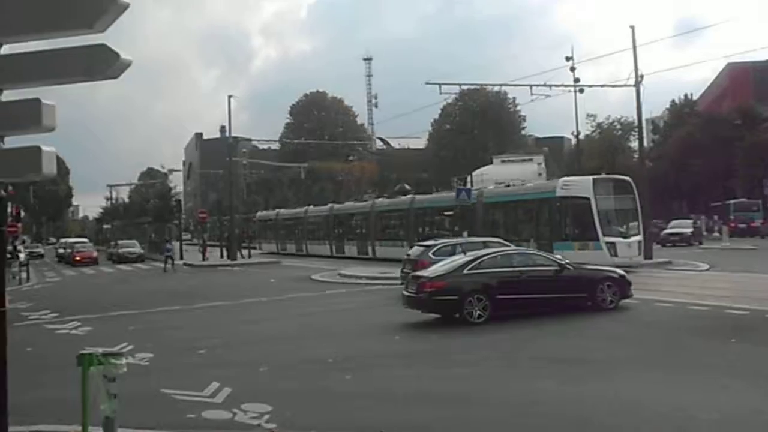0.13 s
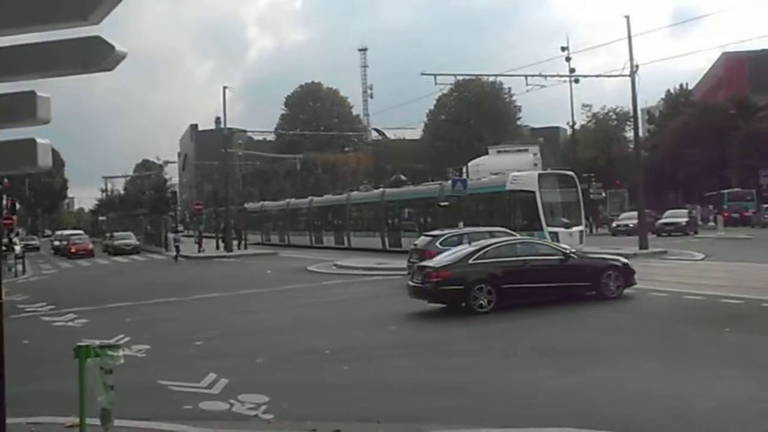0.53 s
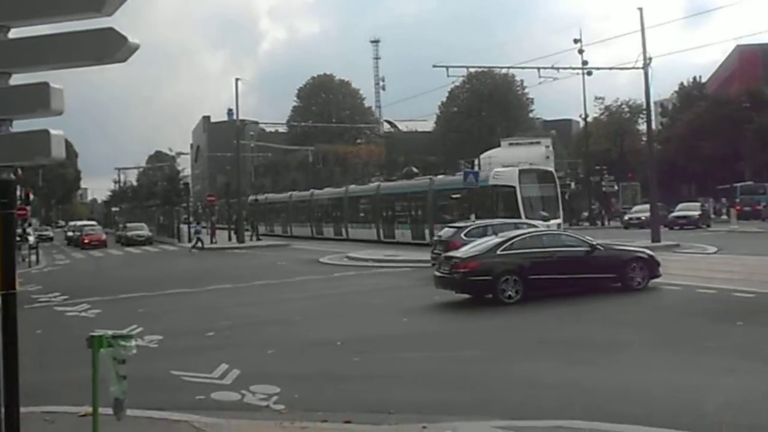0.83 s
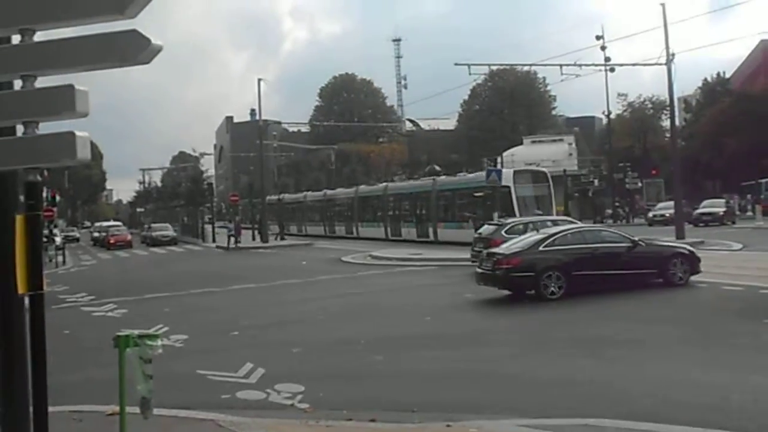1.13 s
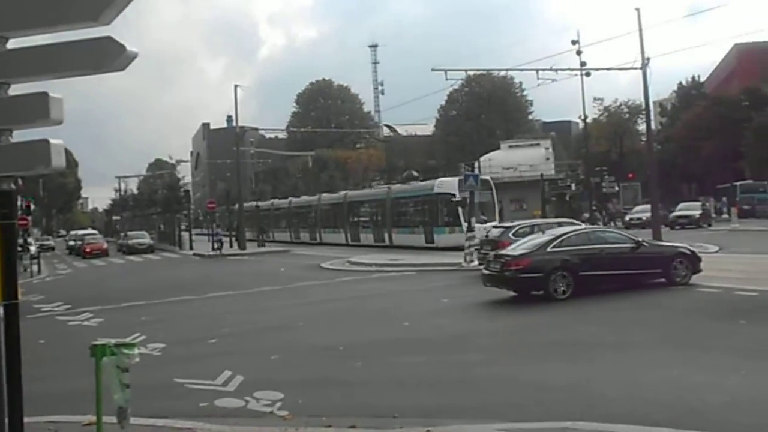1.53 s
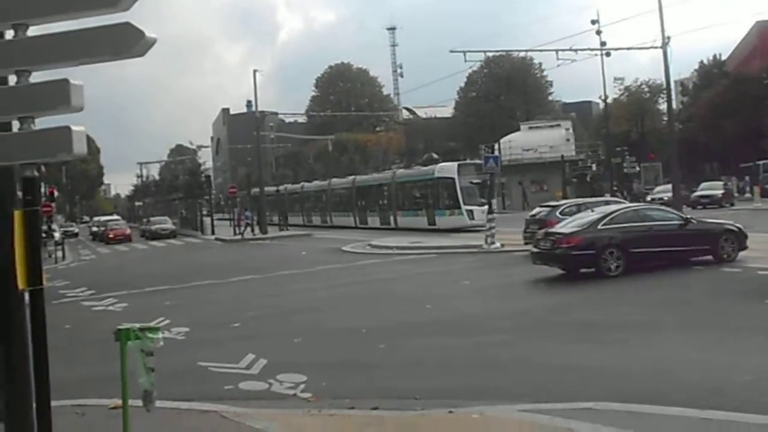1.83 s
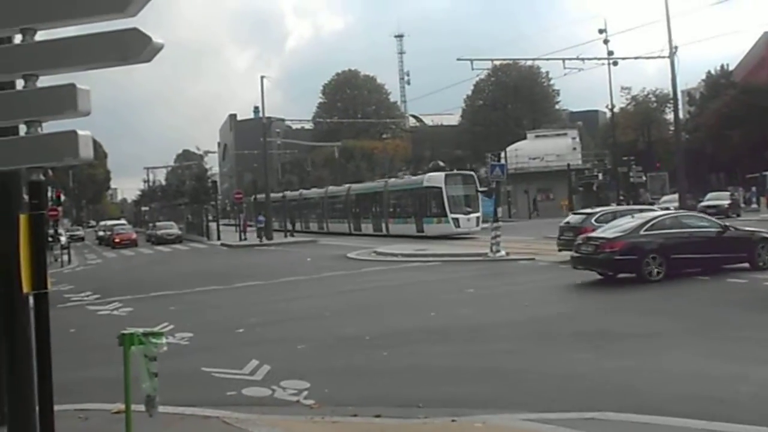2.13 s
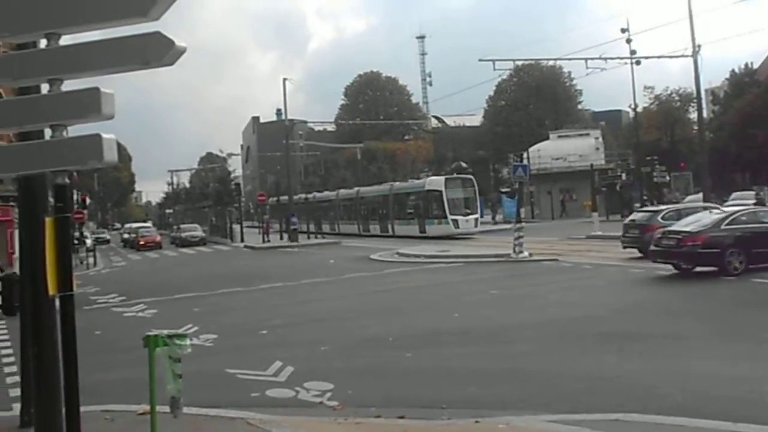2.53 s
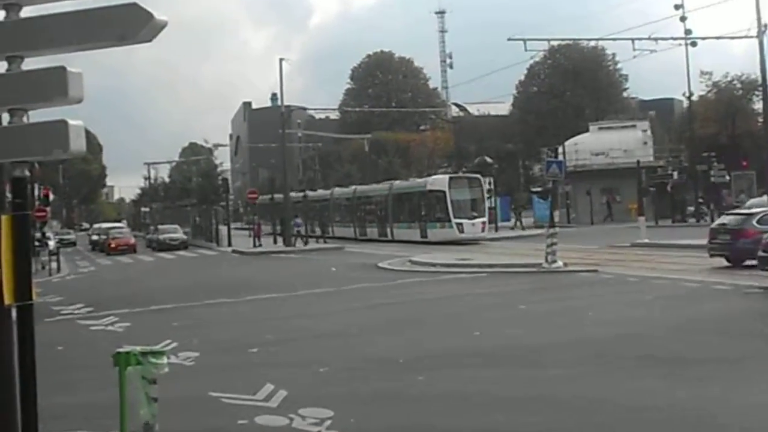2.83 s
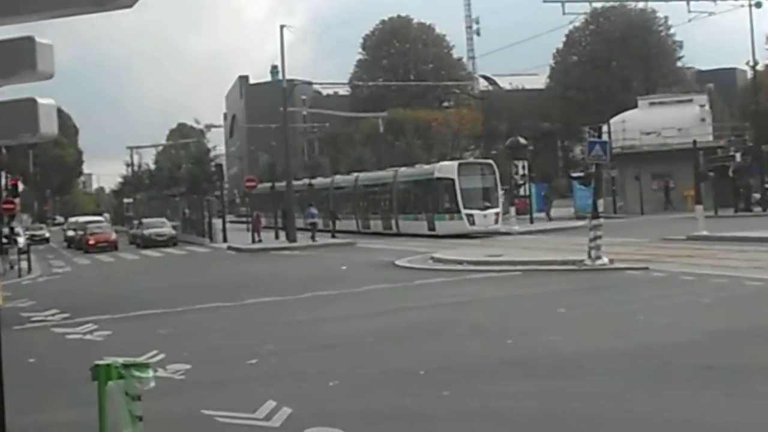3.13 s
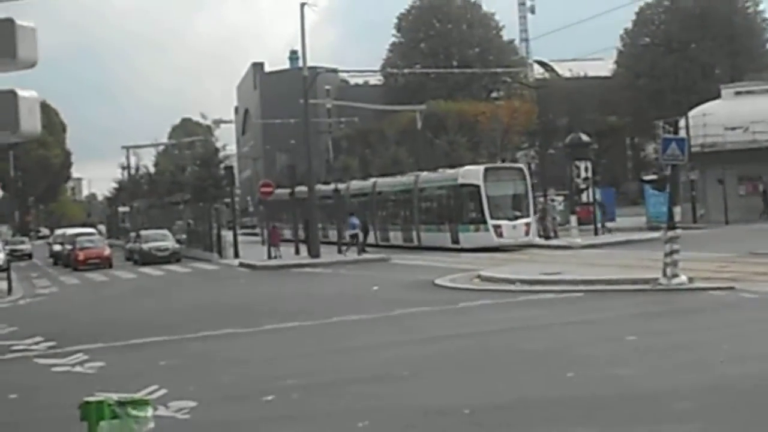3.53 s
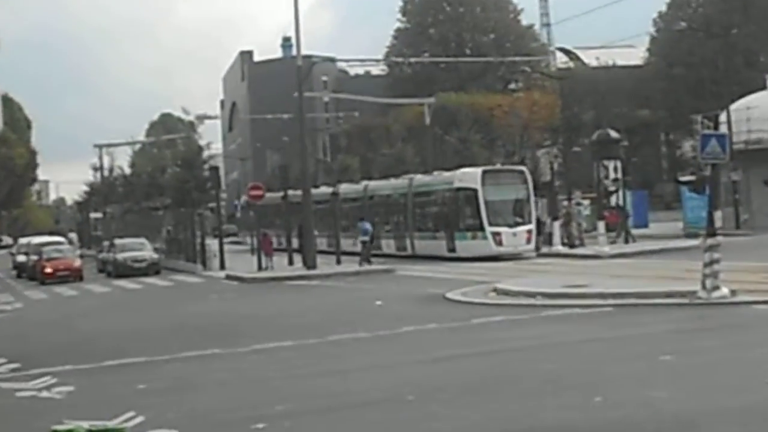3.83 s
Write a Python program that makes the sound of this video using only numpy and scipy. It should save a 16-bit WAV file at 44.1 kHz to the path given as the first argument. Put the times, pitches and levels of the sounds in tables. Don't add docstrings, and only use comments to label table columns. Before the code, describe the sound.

Tram wheel squeal, high and sustained, ringing over the low traffic rumble of a city crossing

```python
import sys
import numpy as np
from scipy import signal
from scipy.io import wavfile

SR = 44100
rng = np.random.default_rng(int(sys.argv[2]) if len(sys.argv) > 2 else 0)


def boost_factor(decibels):
    exponent = np.asarray(decibels, float) / 20
    return 10 ** exponent


def pcm_store(signal):
    levels = np.round(np.clip(np.atleast_2d(signal), -1, 1) * 32767)
    wavfile.write(sys.argv[1], SR, levels.astype(np.int16).T)


N = 176400

# (time [s], level [dB])
TRAFFIC_SWELL = [(0.07, -50), (0.36, -35.5), (0.95, -26), (0.97, -28.5), (1.15, -25), (1.83, -23.5),
                 (2.01, -22.5), (2.05, -23), (2.13, -23.5), (3.88, -25.5), (3.89, -23.5), (4.0, -27.5)]
# (frequency [Hz], level [dB per Hz])
ROAD_COLOUR = [(35, -53), (60, 2.5), (114, -4), (246, 3), (441, -8), (681, -8), (2450, -26.5),
               (3850, -56.5), (5400, -72), (7020, -85), (11900, -120)]
# (centre [Hz], width [Hz], level over the road [dB])
BODY_DRONES = [
    (254, 63, -10),
    (620, 127, -7),
    (1240, 248, -11.5),
    (2450, 100, -34.5),
    (3740, 440, -36.5),
    (3180, 270, -46),
]
# (pitch [Hz], level [dB])
MOTOR_WHINE = [
    (2459, -52),
    (4916, -66),
]
# (start [s], end [s], first pitch [Hz], last pitch [Hz], level [dB])
ENGINE_HUMS = [
    (1.3, 3.0, 151, 154, -38),
    (1.0, 2.6, 238, 276, -38),
]
# (time [s], length [s], pitch [Hz], level [dB])
BIRD_CHIRPS = [
    (1.26, .08, 5980, -64),
    (1.6, .085, 5990, -59),
    (1.725, .105, 5950, -55),
    (1.855, .11, 5945, -55),
]
# (time [s], level [dB])
HISS_SWELL = [(0.08, -79.5), (0.39, -62), (0.8, -57.5), (0.83, -54), (0.92, -56), (1.48, -48.5),
              (1.54, -47), (1.56, -50), (1.99, -49), (2.01, -50), (3.94, -53), (4.0, -52)]
# (frequency [Hz], level [dB per Hz])
HISS_COLOUR = [(5500, -24), (6300, -19), (7000, -12.5), (8000, -7), (9500, 0.5), (10700, 1.5), (11500, -15),
               (12400, -9)]
# (time [s], length [s], level [dB], centre [Hz])
VALVE_PUFFS = [
    (0.164, .006, -63, 9400),
    (1.112, .02, -49.5, 9800),
    (1.503, .02, -41, 10200),
    (1.518, 0.013, -40, 8500),
    (1.535, 0.024, -45.5, 8950),
    (2.368, .004, -40, 10500),
    (3.3, 0.0091, -43, 10000),
    (3.534, .015, -46, 10000),
]
# (time [s], level [dB])
SQUEAL_LEVEL = [(1.33, -51), (1.385, -44), (1.5, -46.5), (1.68, -50), (1.97, -46.5), (2.4, -44), (2.5, -46),
                (2.75, -47.5), (3.02, -44), (3.3, -43), (3.62, -44), (3.8, -54.5), (3.92, -62), (4, -42)]
# (time [s], pitch [Hz])
SQUEAL_PITCH = [(1.33, 3765), (1.39, 3708), (1.5, 3712), (1.68, 3740), (1.8, 3705), (1.97, 3722),
                (2.2, 3685), (2.4, 3690), (2.5, 3625), (2.75, 3640), (3.02, 3668), (3.3, 3652),
                (3.62, 3652), (3.8, 3610), (3.92, 3600), (4, 3630)]
# (time [s], level [dB])
SLIP_BITE = [(1.33, -24), (2.0, -16), (2.4, -8), (3.1, -7), (3.3, -6.5), (3.68, -7), (3.8, -15), (4, -20)]
# (start [s], end [s], pitch [Hz], width [Hz], level [dB])
RIM_MODES = [
    (1.5, 2.47, 3780, 16, -54),
    (2.2, 4.1, 3505, 50, -52),
    (1.4, 3.85, 3630, 100, -50.5),
    (3.05, 3.75, 3835, 12, -61),
    (.95, 1.5, 5180, 80, -70),
]
# (centre [Hz], width [Hz])
MIC_NOTCHES = [
    (5512.5, 500),
    (11025, 330),
]


def rms_one(x):
    return x / np.sqrt(np.mean(np.abs(x) ** 2) + 1e-20)


def in_time(rows):
    s, *columns = np.transpose(rows)
    return [np.interp(np.arange(N) / SR, s, column) for column in columns]


def drift(rate_hz):
    r = np.exp(-20 * np.pi * rate_hz / SR)
    white = rng.standard_normal(N // 10 + 9002)
    slow = signal.lfilter([1], [1, -2 * r, r * r], white)[9000:]
    return np.interp(np.arange(N) / 10, np.arange(len(slow)), rms_one(slow))


def gate(start, length, edge):
    t = np.arange(N) / SR - start
    return np.clip(np.minimum(t, length - t) / edge + 0.5, 0, 1)


def resonate(x, hz, width_hz):
    r = np.exp(-np.pi * width_hz / SR)
    return signal.lfilter([1, 0, -1], [1, -2 * r * np.cos(2 * np.pi * hz / SR), r * r], x)


def band_pass(x, low_hz, high_hz, order):
    return signal.sosfilt(signal.butter(order, [low_hz, high_hz], "band", fs=SR, output="sos"), x)


def banded_noise(spectrum, edges, patchy_db, shared_db):
    out = 0
    together = drift(8.5)
    white = rng.standard_normal((2, N))
    hz, db = np.transpose(spectrum)
    for k, (low, high) in enumerate(zip(edges, edges[1:])):
        band = band_pass(white[k % 2], low, high, 3)
        level_db = np.interp(np.log(low * high) / 2, np.log(hz), db)
        out = out + band * boost_factor(level_db + patchy_db * drift(6.5) + shared_db * together)
    return rms_one(out)


def wavering(hz, width_hz, steady):
    spin = np.exp(2j * np.pi * np.cumsum(hz + np.zeros(N)) / SR)
    echoes = drift(width_hz) + 1j * drift(width_hz)
    return rms_one(np.real(spin * (steady + echoes)))


def wind(traffic_db):
    rumble = rms_one(band_pass(rng.standard_normal(N), 18, 68.4, 2))
    return rumble * boost_factor(-36.5 + 0.17 * (traffic_db - traffic_db.max())) * gate(0.11, 9, 0.5)


def body_drones():
    out = 0
    for hz, width_hz, db in BODY_DRONES:
        level = boost_factor(db + drift(4))
        core = resonate(rng.standard_normal(N), hz, width_hz)
        out = out + level * rms_one(resonate(core, hz, 6 * width_hz))
    return out


def motor_whine():
    tones = sum(boost_factor(db) * wavering(hz, 4, 1.6) for hz, db in MOTOR_WHINE)
    return tones * gate(3.05, 9, 0.1)


def traffic():
    level_db, = in_time(TRAFFIC_SWELL)
    road = banded_noise(ROAD_COLOUR, np.geomspace(50, 5400, num=19), patchy_db=0.5, shared_db=-1.52)
    return boost_factor(level_db - 1.5) * (road + body_drones()) + wind(level_db) + motor_whine()


def engines():
    t = np.arange(N) / SR
    out = 0
    for s, end, first_hz, last_hz, db in ENGINE_HUMS:
        hz = np.interp(t, [s, end], [first_hz, last_hz])
        out = out + boost_factor(db) * gate(s, end - s, 0.4) * wavering(hz, 5, 0.9)
    return out


def bird():
    t = np.arange(N) / SR
    out = 0
    for s, length, hz, db in BIRD_CHIRPS:
        falling_hz = hz - 70 * (t - s) / 0.1
        out = out + boost_factor(db) * gate(s, length, 0.05) * wavering(falling_hz, 45, 0.8)
    return out


def hiss():
    level_db, = in_time(HISS_SWELL)
    bed = banded_noise(HISS_COLOUR, np.geomspace(5500, 12400, num=13), patchy_db=0.35, shared_db=-0.5)
    out = boost_factor(level_db + 3) * bed
    noise = rng.standard_normal(N)
    for s, length, db, hz in VALVE_PUFFS:
        puff = noise
        for _ in range(3):
            puff = resonate(puff, hz, 3500)
        out = out + boost_factor(db) * gate(s, length, 0.0035) * rms_one(puff)
    return out


def rim_modes(on):
    (hz,), (db,) = in_time(SQUEAL_PITCH), in_time(SQUEAL_LEVEL)
    out = boost_factor(db) * on * wavering(hz + 5 * drift(6.8), 25, 0.9)
    for s, end, mode_hz, width_hz, mode_db in RIM_MODES:
        out = out + boost_factor(mode_db) * gate(s, end - s, 0.2) * wavering(mode_hz, width_hz, 0.3)
    return out


def slip_overtones():
    bite_db, = in_time(SLIP_BITE)
    since_start = np.arange(N) / SR - SQUEAL_LEVEL[0][0]
    second_width_hz, third_width_hz = 97, 210
    second = wavering(7430 - 84 * since_start, second_width_hz, 0)
    second = second + boost_factor(-6) * wavering(2 * RIM_MODES[1][2], second_width_hz, 0)
    third = wavering(10550, third_width_hz, 0) + boost_factor(-8) * wavering(11350, third_width_hz, 0)
    third_level = boost_factor(7 + 1.35 * bite_db + 1.5 * drift(14))
    third_swell = 0.45 + 0.46 * gate(3.15, 0.6, 0.17)
    return boost_factor(-44.5) * (boost_factor(bite_db) * second + third_level * third_swell * third)


def squeal():
    on = gate(1.33, 9, 0.012)
    return rim_modes(on) + on * slip_overtones()


def scene():
    return (traffic() + engines() + bird() + hiss() + squeal())[None]


def top_cut(x):
    return signal.sosfilt(signal.butter(12, 12230, fs=SR, output="sos"), x)


def record(dry):
    x = dry * gate(0.0735, 9, 0.00052)
    for hz, width_hz in MIC_NOTCHES:
        x = signal.lfilter(*signal.iirnotch(hz, hz / width_hz, SR), x)
    dip_hz, dip_width_hz, dip_share = 5810, 1350, 0.58
    b, a = signal.iirpeak(dip_hz, dip_hz / dip_width_hz, SR)
    x = x - dip_share * signal.lfilter(b, a, x)
    x = signal.sosfilt(signal.butter(14, 11630, fs=SR, output="sos"), x)
    return top_cut(x)


dry = scene()
out = record(dry)
pcm_store(out)
```